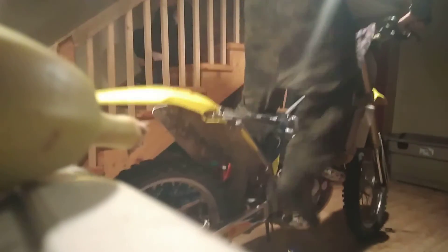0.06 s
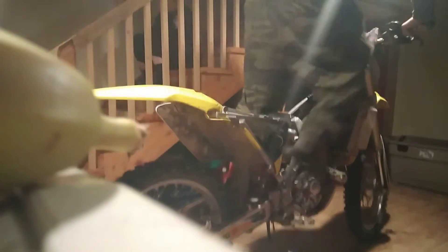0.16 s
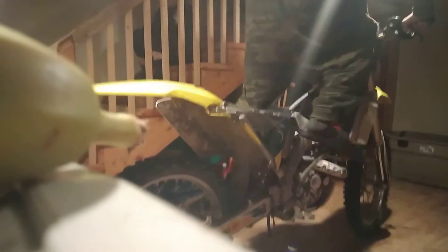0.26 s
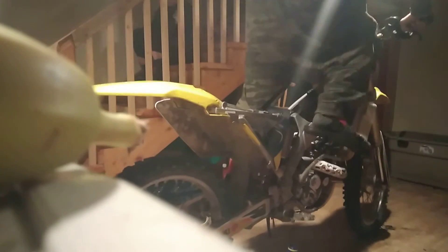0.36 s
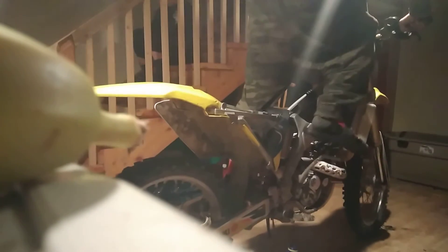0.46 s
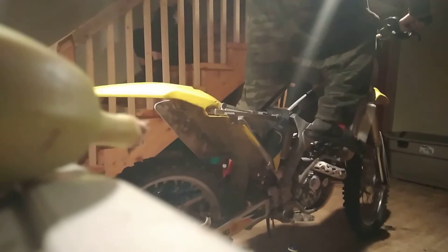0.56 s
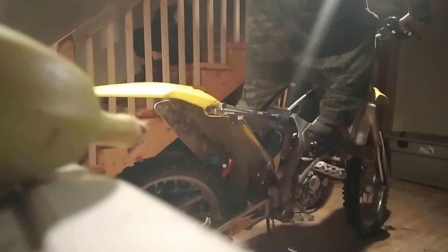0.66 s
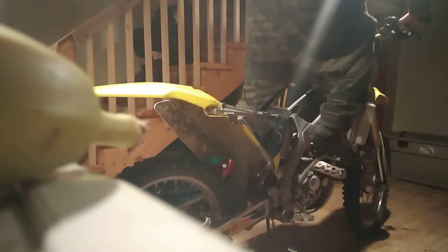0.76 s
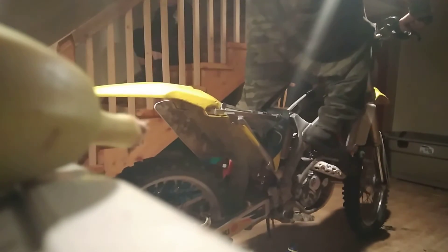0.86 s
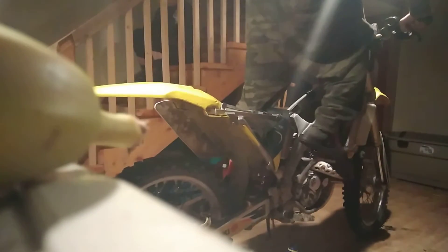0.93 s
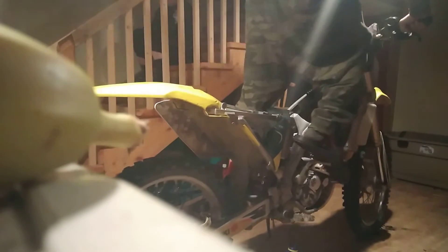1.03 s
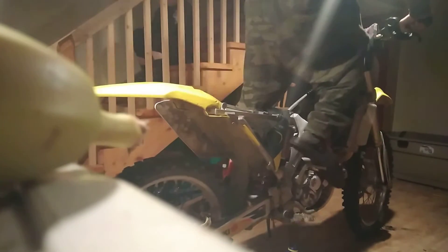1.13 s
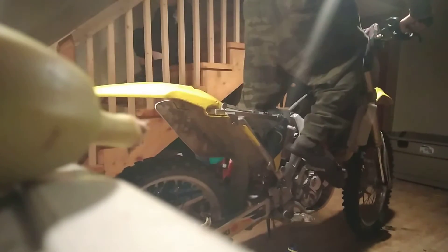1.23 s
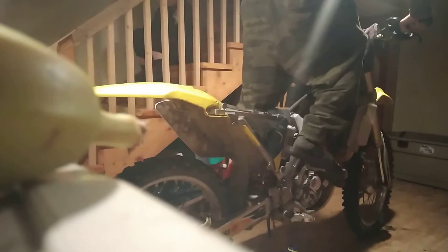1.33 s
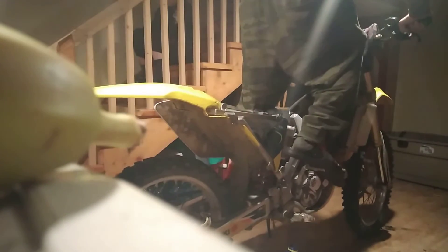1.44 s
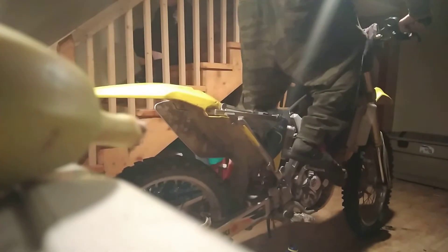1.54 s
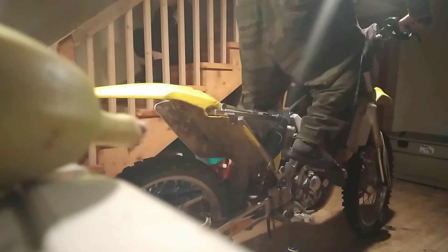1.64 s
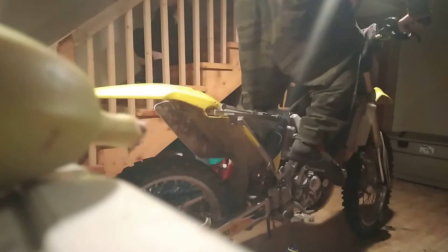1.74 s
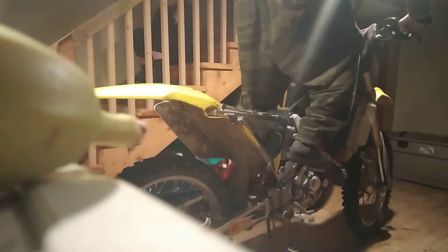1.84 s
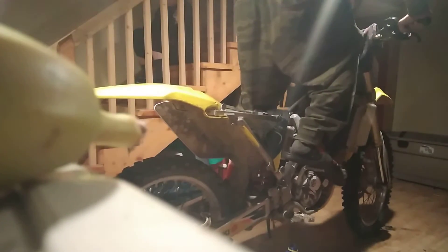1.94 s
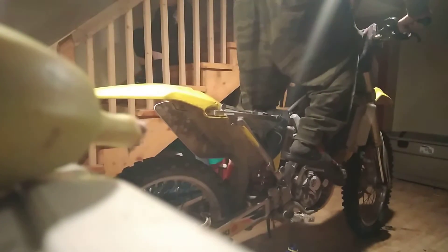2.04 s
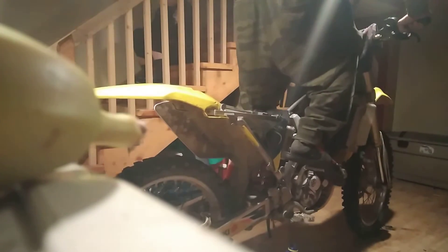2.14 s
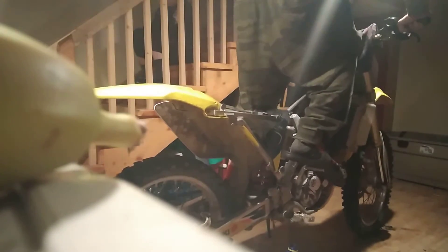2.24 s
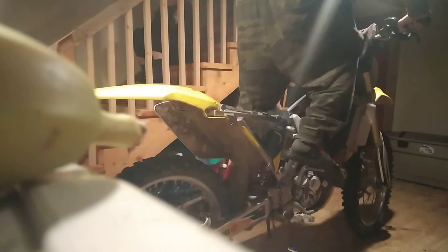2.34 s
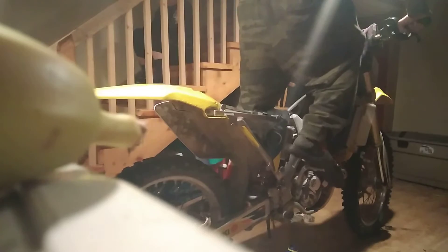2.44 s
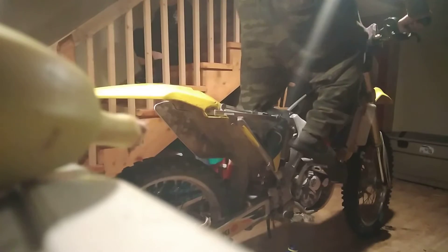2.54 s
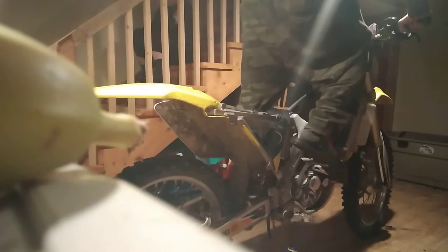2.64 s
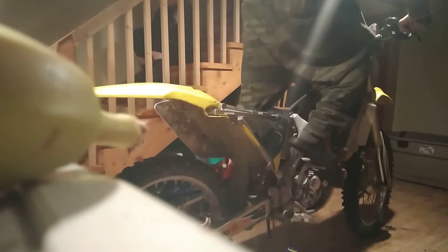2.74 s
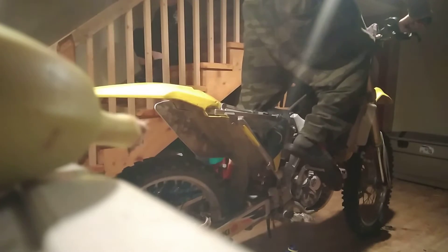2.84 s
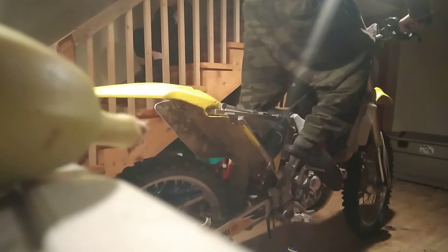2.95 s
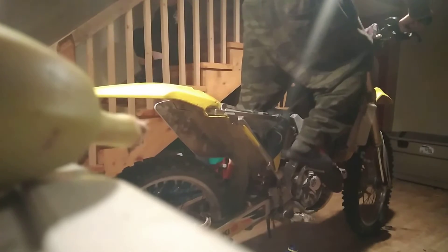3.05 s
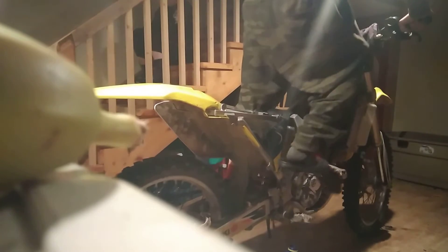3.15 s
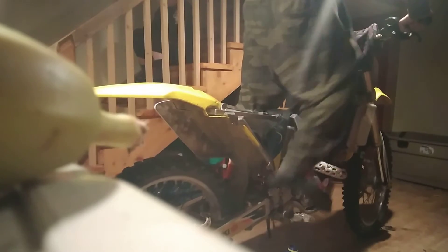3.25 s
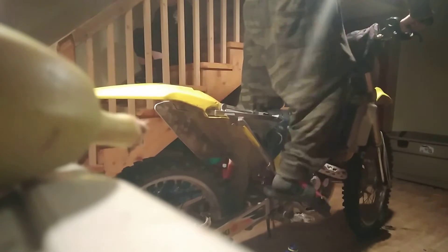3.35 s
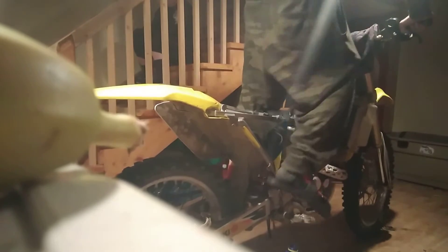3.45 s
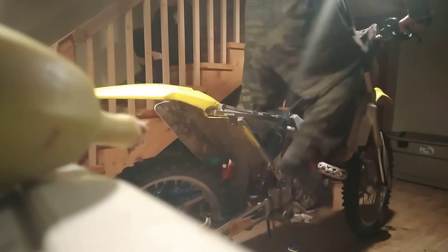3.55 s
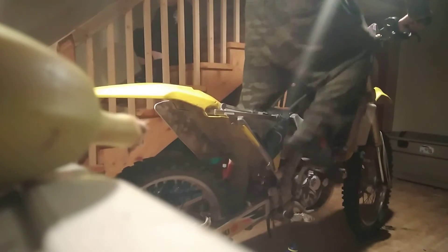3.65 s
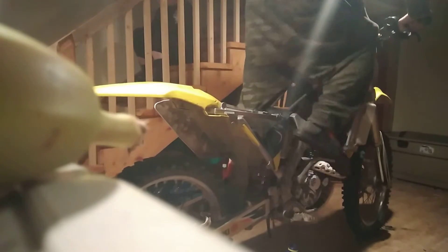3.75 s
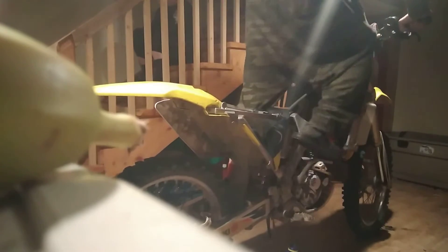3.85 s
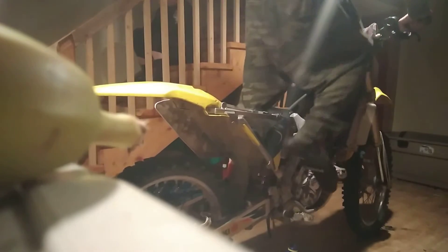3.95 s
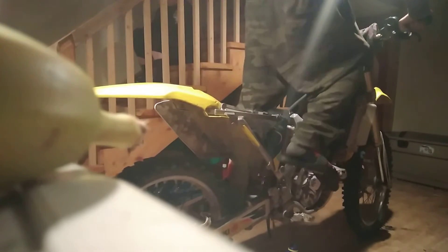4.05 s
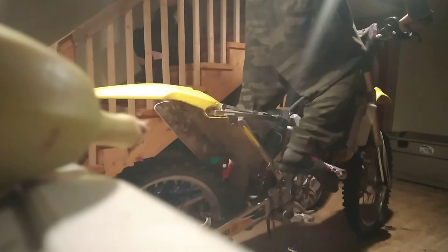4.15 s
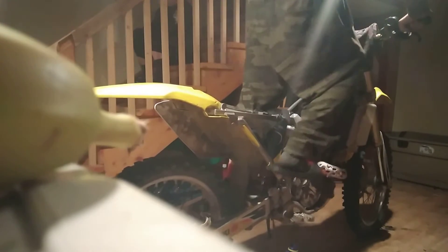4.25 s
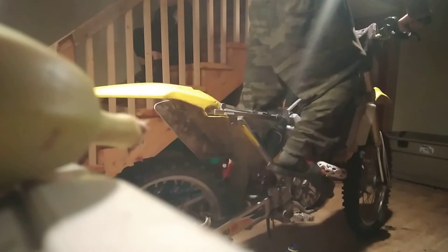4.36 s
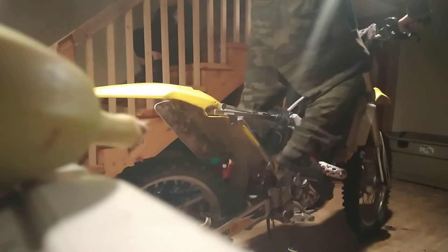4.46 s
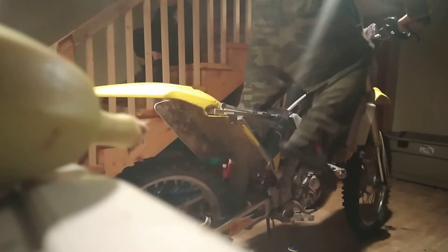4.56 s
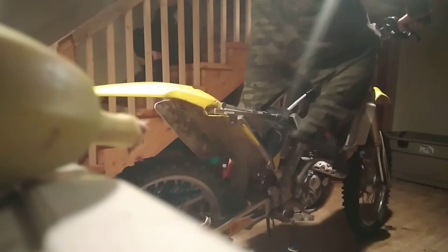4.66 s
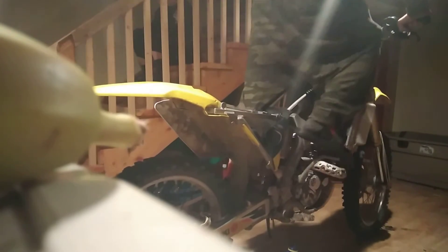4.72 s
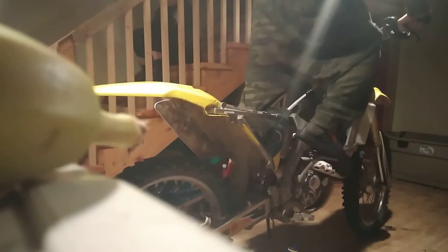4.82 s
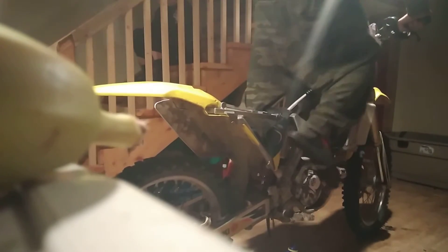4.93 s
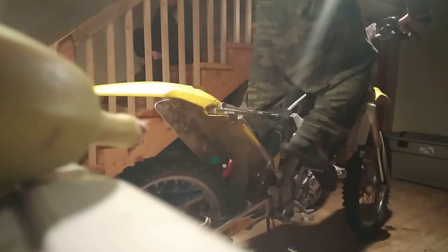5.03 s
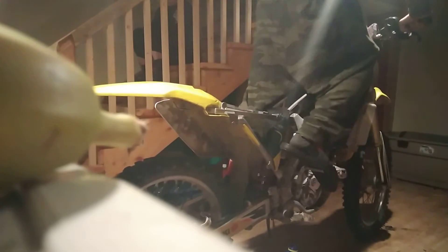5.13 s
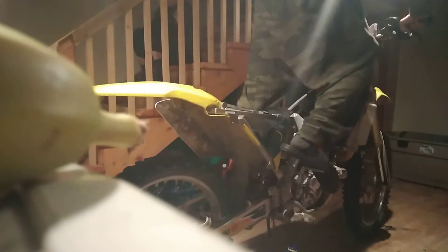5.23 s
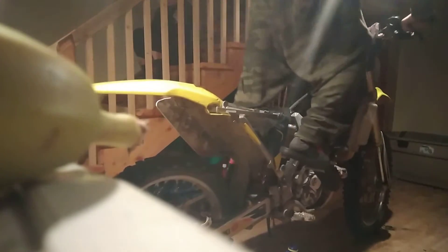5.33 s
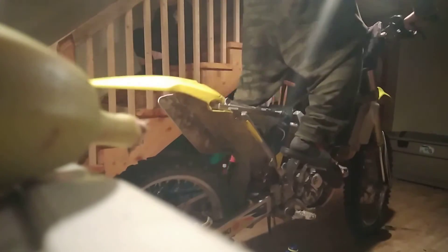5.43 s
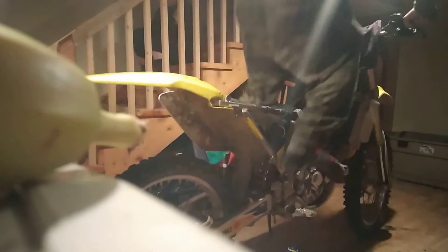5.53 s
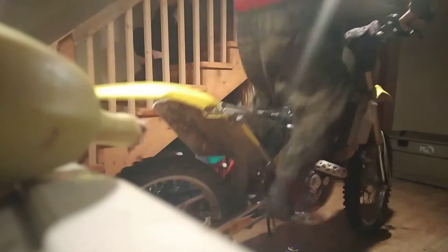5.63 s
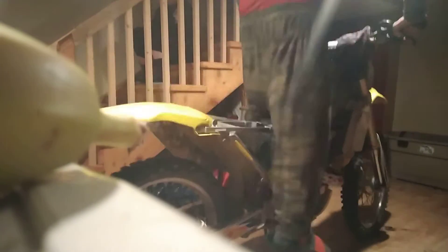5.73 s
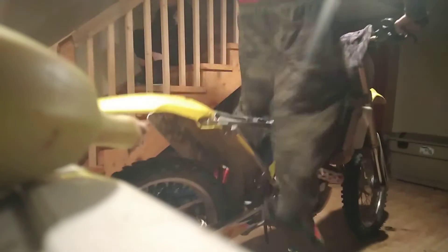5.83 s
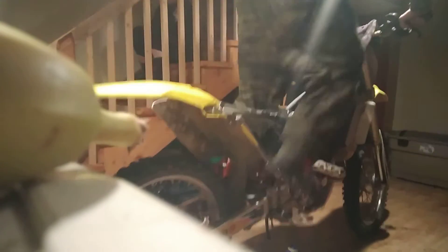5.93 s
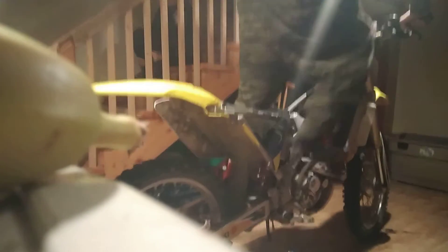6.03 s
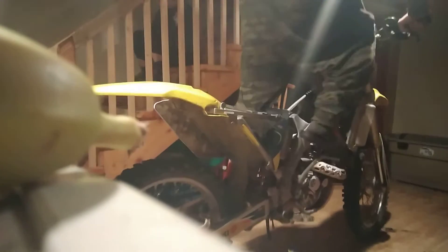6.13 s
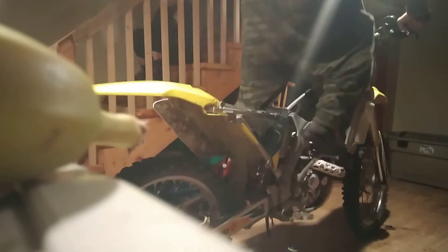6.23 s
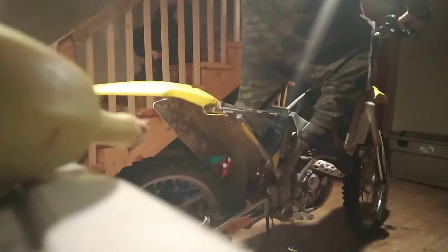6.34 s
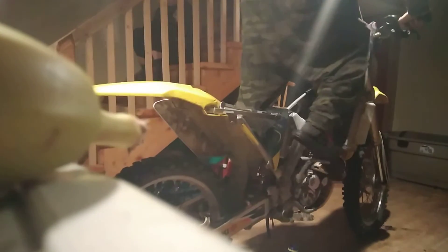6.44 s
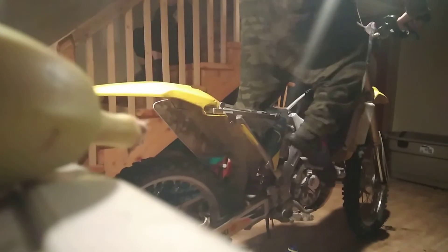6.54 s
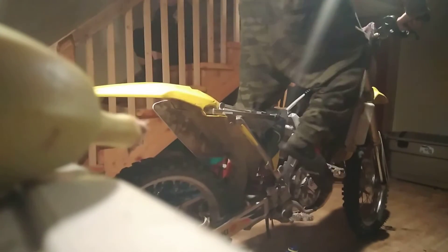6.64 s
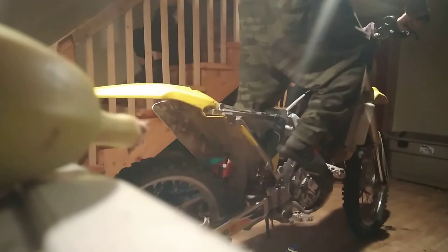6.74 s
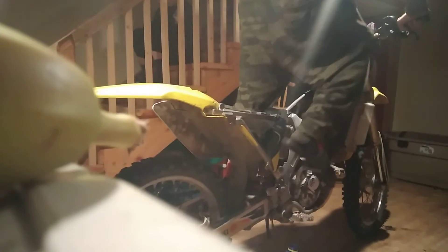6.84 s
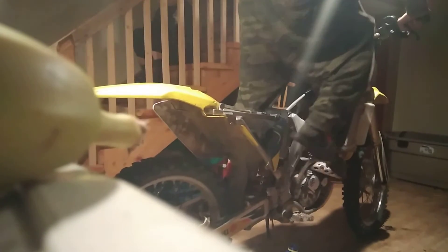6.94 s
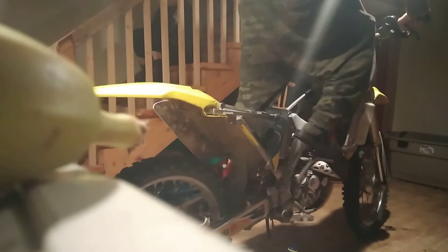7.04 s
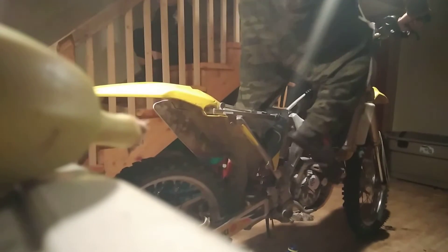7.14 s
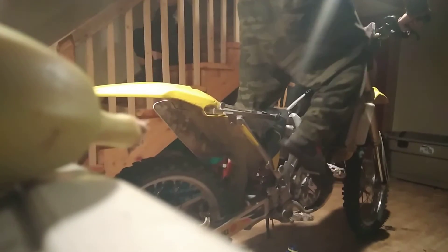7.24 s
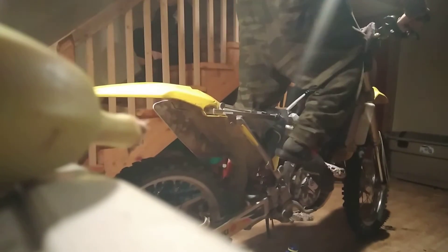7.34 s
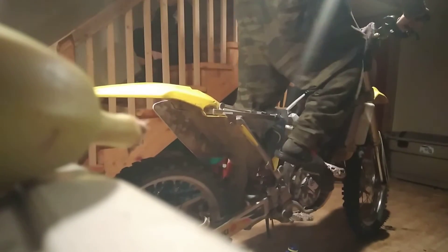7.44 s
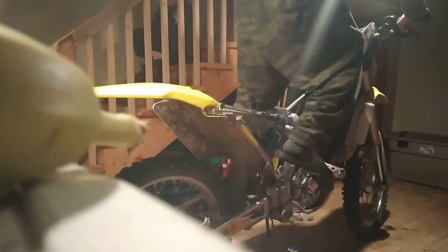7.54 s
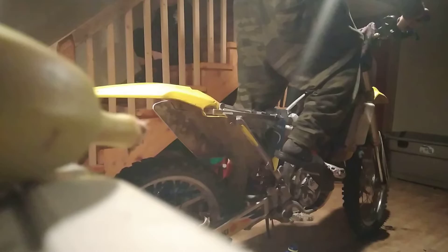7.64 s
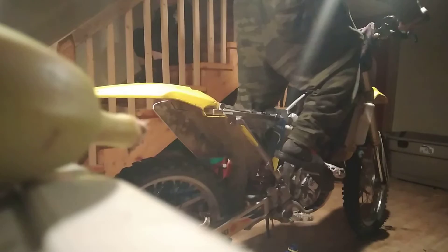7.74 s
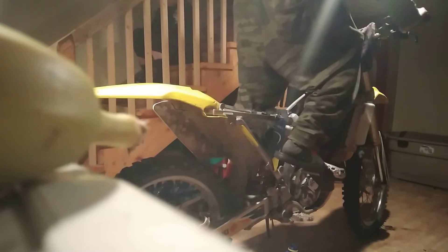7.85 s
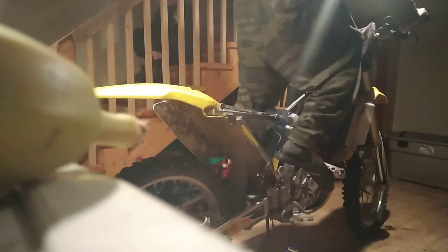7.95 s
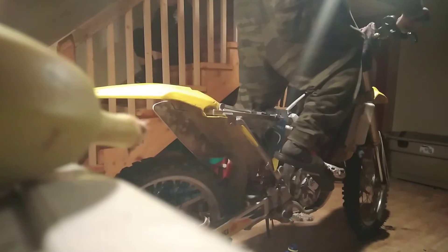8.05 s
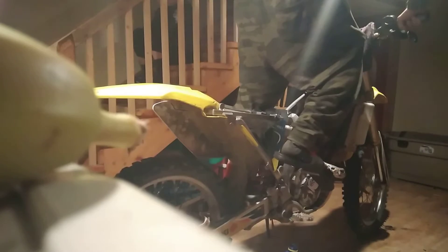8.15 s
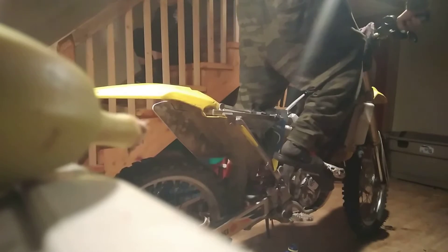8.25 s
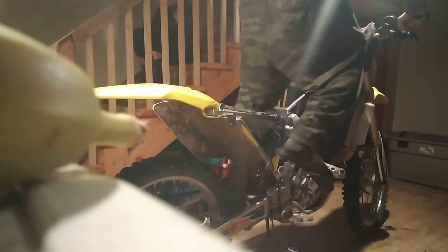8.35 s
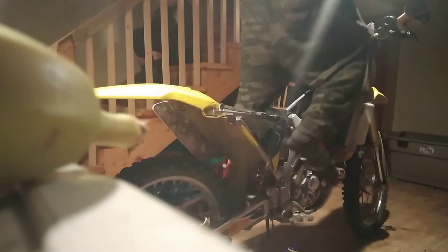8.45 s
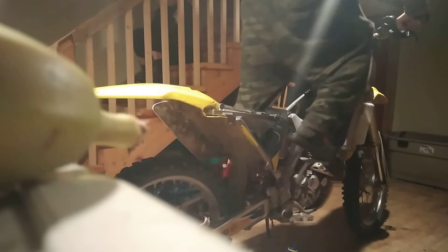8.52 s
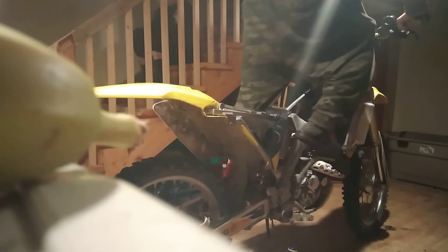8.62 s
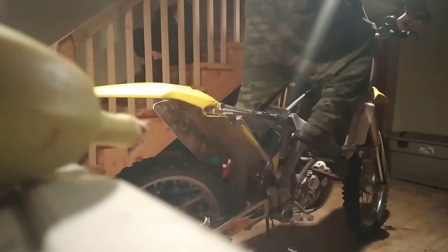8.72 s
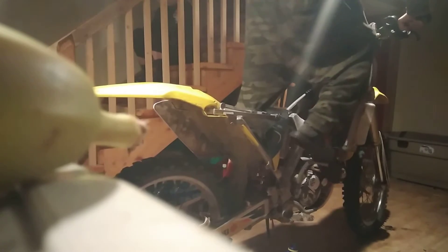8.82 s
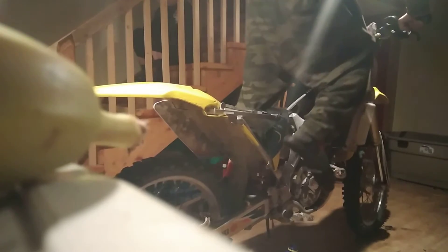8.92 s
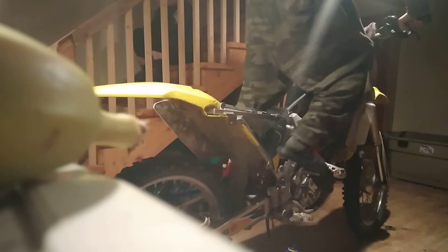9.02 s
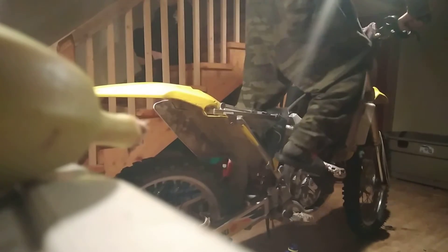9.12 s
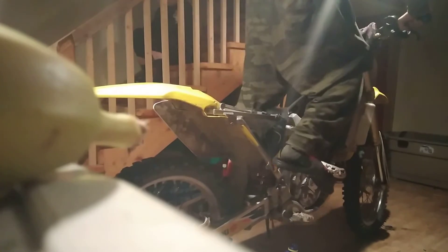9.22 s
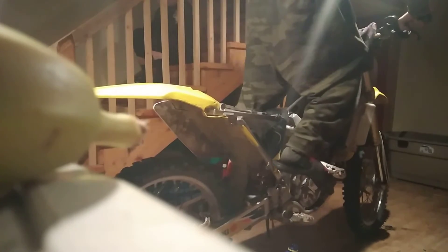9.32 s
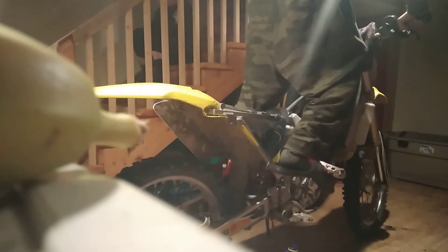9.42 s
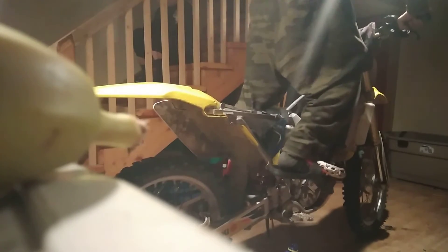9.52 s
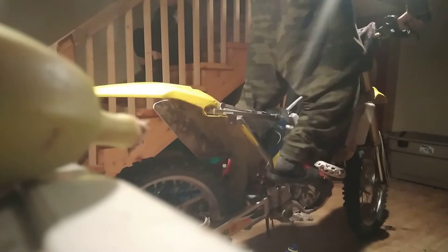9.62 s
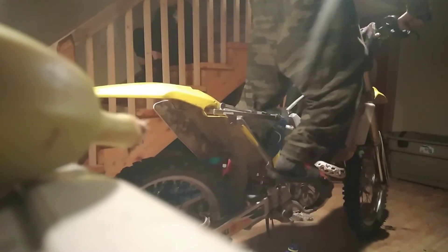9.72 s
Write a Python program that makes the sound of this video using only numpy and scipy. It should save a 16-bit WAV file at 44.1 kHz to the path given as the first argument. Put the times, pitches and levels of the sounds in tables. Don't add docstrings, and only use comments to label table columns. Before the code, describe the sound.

From 0 s, cut in at full force, a cold dirt bike engine is spun by a kick: rapid gear-tooth bites, rasping metal rattle and hollow low puffs in the pipe, clipping the input and sinking by 0.35 s. A clack and thud follow at 0.5-0.6 s. From 1 to 3 s there are faint ticks, barely audible cloth brushing and dull boot thuds near 1.9 and 2.3 s. At 3.2-3.35 s a quick scrape ends in a bright clank; more clacks at 3.7 s, soft knocks at 4-5 s, a heavy boom at 5.45 s. The second kick bursts at 5.68-5.97 s, clattery and loud, with trailing clacks to 6.2 s. Then quiet: small clicks at 7.3 and 7.8 s, a hollow clack at 8.2 s, faint ticks to the end near 9.8 s. Close phone, wooden basement, low rumble, treble gated between sounds.

```python
import sys
import numpy as np
from scipy import signal
from scipy.fft import rfft, irfft, next_fast_len
from scipy.io import wavfile
from scipy.ndimage import uniform_filter1d, minimum_filter1d, map_coordinates

SR = 44100
rng = np.random.default_rng(int(sys.argv[2]) if len(sys.argv) > 2 else 0)


def wav_out(sig):
    wavfile.write(sys.argv[1], SR, np.round(np.clip(np.atleast_2d(sig).T, -1, 1) * 32767).astype(np.int16))


def makeup_ratio(level_db):
    decades = np.asarray(level_db, float) / 20
    return 10 ** decades


N = 431298


def unit(x):
    return x / np.sqrt(np.mean(x ** 2) + 1e-20)


def along(points, hz):
    f, v = np.transpose(points)
    return np.interp(np.log(hz + 1), np.log(f + 1), v)


def curves(rows, silent=None):
    s, *cols = np.transpose(rows)
    return np.array([np.interp(np.arange(N) / SR, s, c, silent, silent) for c in cols])


def strokes(tables):
    return np.max([curves(rows, silent=-200) for rows in tables], axis=0)


def wobble(rate):
    steps = np.arange(0, N + 32, 32)
    knots = rng.standard_normal(int(N * rate / SR) + 4)
    return np.interp(np.arange(N), steps, map_coordinates(knots, [steps * rate / SR]))


def swell(s, db, rise, fall):
    t = np.arange(N) / SR - s
    return makeup_ratio(db + np.minimum(rise * t, -fall * t))


def filtered(x, response):
    m = next_fast_len(x.shape[-1] + SR // 8)
    return irfft(rfft(x, m) * response(np.fft.rfftfreq(m, 1 / SR)), m)[..., :x.shape[-1]]


def mode(f, hz, width, db):
    return makeup_ratio(db) * 1j * f * width / (hz * hz - f * f + 1j * f * width)


def noise(gain, size=N):
    # freq_hz, correlation
    alike = [(30, 0.92), (250, 0.94), (500, 0.88), (1000, 0), (2000, 0)]
    m = next_fast_len(size)
    f = np.fft.rfftfreq(m, 1 / SR)
    turn = np.arccos(np.clip(along(alike, f), 0, 1)) / 2
    real, imaginary = rng.standard_normal((2, 2, len(f)))
    spectrum = (real + 1j * imaginary) * gain(f)
    mid, side = irfft(spectrum * [np.cos(turn), np.sin(turn)], m)[:, :size]
    return unit(np.array([mid + side, mid - side]))


def coloured(spectrum, size=N):
    return noise(lambda f: makeup_ratio(along(spectrum, f)), size=size)


def patchy(x, depth_db):
    z = signal.stft(x, nperseg=512)[2]
    field = uniform_filter1d(rng.standard_normal(z.shape[1:]), size=4, axis=0)
    field = uniform_filter1d(field, size=9, axis=1)
    return unit(signal.istft(z * makeup_ratio(depth_db * unit(field)), nperseg=512)[1][:, :N])


def looped(x):
    return x[:, np.arange(N) % x.shape[1]]


def add(track, s, sound):
    part = track[round(s * SR):][:len(sound)]
    part += sound[:len(part)]


def gears():
    # time_s, pumping_db of the piston, load_db on the gears
    kicks = [
        [(0.0, -11, -17), (0.19, -5, -12), (0.3, -16.5, -21), (0.462, -68, -54), (0.49, -36, -42)],
        [(5.675, -33, -62), (5.712, -16, -29), (5.755, -13.5, -25.5), (5.765, -20, -15.5), (5.81, -8.5, -14.5),
         (5.97, -25.5, -28.5), (6.048, -42, -39.5), (6.1, -43.5, -35)],
    ]
    # freq_hz, density_db
    case = [(310, -28), (520, -1), (539, -1), (568, -2), (803, -7.5), (1270, -8.5), (1500, -20),
            (1950, -43.5), (3300, -120)]
    # freq_hz, density_db
    clatter = [(760, -32.5), (1300, -8.5), (2630, -4.5), (2980, -13), (3980, -8.5), (8760, -15.5),
               (9720, -16.5), (11600, -30), (15500, -33.5)]
    # freq_hz, width_hz, level_db
    fins = [(1688, 40, 6), (3550, 130, 0)]
    # freq_hz, density_db
    body = [(40, -120), (60, -5.5), (150, -1), (300, -5), (550, -4), (800, -40.5), (1500, -120)]
    top_hz, top_fades = 10800, 1.5

    pump_db, load_db = strokes(kicks)
    ringing = lambda f: makeup_ratio(along(clatter, f)) * (1 + sum(abs(mode(f, *m)) for m in fins))
    metal = patchy(noise(ringing, size=N // 4), depth_db=3)
    top = looped(filtered(metal, lambda f: 1 / (1 + (top_hz / (f + 1)) ** 20)))
    fine = makeup_ratio(top_fades * (load_db + 16.5)) * top
    rattle = makeup_ratio(load_db - 0.4 + 2.2 * wobble(55)) * (looped(metal) - top + fine)
    hum = looped(patchy(coloured(case, size=N // 4), depth_db=2.5))
    drone = makeup_ratio(load_db + 0.5 + 4.0 * wobble(40)) * hum
    pumping = makeup_ratio(pump_db + 2.0 + 4.0 * wobble(35)) * looped(coloured(body, size=N // 4))
    return rattle + drone + pumping


def pipe():
    # start_s, peak_db, pitch_hz
    puffs = [(0.0, -3.5, 169.6), (0.037, -1.5, 180.9), (0.094, -2, 179), (0.146, -2.5, 165.4),
             (0.184, -4.5, 207.6), (0.224, -2.5, 181.1), (0.234, -4, 128), (0.249, -5, 177.2),
             (0.284, -7, 175), (5.682, -8, 92), (5.705, -1, 109.8), (5.765, -4.5, 166.1),
             (5.835, -3.5, 177.1), (5.857, -2, 164.7), (5.879, -6, 84.44), (5.907, -3, 113.1),
             (5.939, -5.5, 159.4), (5.968, -10.5, 136)]
    # start_s, peak_db, pitch_hz
    last_puffs = [(.31, -13.5, 172.3)]
    # start_s, peak_db, pitch_hz
    teeth = [(0.0, 1.5, 418.7), (0.027, 2.5, 427.5), (0.059, 2, 407), (0.084, 4, 447), (0.115, 0.5, 455.7),
             (0.139, 1, 447.2), (0.164, -4, 557.8), (0.192, -2, 356.7), (0.219, -4, 440), (.25, -5, 400),
             (0.269, -3, 499), (0.3, -20, 471), (0.364, -19.5, 487), (.16, -3, 300), (.29, -11, 510),
             (5.715, -5.5, 429.6), (5.765, -3, 460), (5.81, 0.5, 445.3), (5.817, 5, 494.5),
             (5.839, -3, 396), (5.894, -8, 489.6), (5.924, -14, 434), (5.959, -21, 490), (6.009, -26, 512)]
    t = np.arange(SR // 3) / SR
    sound = np.zeros((2, N))
    for table, t60 in ((puffs, 0.19), (last_puffs, 0.46), (teeth, 0.14)):
        for (s, db, hz), skew in zip(table, 0.21 * rng.standard_normal(len(table))):
            for ear, turn in zip(sound, (skew, -skew)):
                ring = np.sin(2 * np.pi * hz * t + turn) * (1 - np.exp(-t / .004))
                add(ear, s, makeup_ratio(db + 1.0 - 60 * t / t60) * ring)
    return sound


def room(x):
    # freq_hz, t60_s
    decay = [(150, 0.2), (400, 0.17), (2700, 0.36), (10000, 0.17)]
    hz, t, z = signal.stft(rng.standard_normal((2, SR // 3)), SR, nperseg=256)
    tail = signal.istft(z * makeup_ratio(-60 * t / along(decay, hz)[:, None]), SR, nperseg=256)[1]
    return signal.oaconvolve(x, tail / np.linalg.norm(tail[0]), axes=1)[:, :N]


def house():
    # time_s, level_db
    stir = [(0, 0), (1.5, 1), (2.9, -3), (3.49, 3), (5.01, -1), (7.9, 1), (9.78, -2)]
    # freq_hz, density_db
    rumble_spectrum = [(7.1, -32.5), (12, 3), (28, -3.5), (43, -16.5), (70, -19.5), (110, -34), (140, -63),
                       (240, -120)]
    # freq_hz, density_db
    tone_spectrum = [(50, -120), (70, -3.5), (250, 1.5), (600, -3), (1500, -18), (4000, -29), (8000, -33.5),
                     (11000, -49.5), (13000, -120)]
    # rumble_peak_s, rumble_db, tone_peak_s, tone_db
    shakes = [
        (0, -30.5, .13, -5.5),
        (5.64, -27.5, 5.86, -24.5),
    ]
    stir_db, = curves(stir)
    rumble = makeup_ratio(stir_db - 56.5) + sum(swell(s, db, rise=120, fall=36) for s, db, _, _ in shakes)
    tone = makeup_ratio(stir_db - 61) + sum(swell(s, db, rise=130, fall=120) for _, _, s, db in shakes)
    deep = rumble * makeup_ratio(8.5 + 4.0 * wobble(2.8)) * coloured(rumble_spectrum)
    return deep + tone * makeup_ratio(1.5 * wobble(6.6)) * coloured(tone_spectrum)


def pings():
    # start_s, peak_db, pitch_hz, t60_s
    kick_pings = [(.03, -14, 1020, .2), (.02, -16, 1280, .15), (.085, -12, 1290, .15),
                  (.085, -18, 2000, .12), (.1, -22, 2700, .2), (.14, -22, 3390, .2), (.153, -28, 8330, .2),
                  (.2, -20, 1690, .4), (.226, -26, 6650, .2), (.232, -24, 3790, .2), (.268, -18, 1675, .3),
                  (.34, -34, 2640, .2), (.345, -30, 1675, .5), (.41, -39, 1675, .3), (5.69, -28, 8100, .2),
                  (5.69, -26, 6490, .2), (5.718, -17, 3450, .35), (5.757, -14, 2050, .2),
                  (5.757, -15, 2430, .2), (5.76, -14, 850, .15), (5.8, -14, 1250, .2),
                  (5.82, -14, 1390, .2), (5.845, -22, 4800, .15), (5.843, -31, 7980, .2),
                  (5.884, -31, 6780, .2), (5.884, -19, 9750, .3), (.15, -16, 1250, .15),
                  (.17, -12, 640, .15), (5.9, -18, 1000, .2), (5.94, -26, 1700, .3), (6.015, -30, 1720, .3),
                  (6.02, -32, 1270, .2), (6.065, -30, 1720, .4), (6.06, -32, 1270, .2),
                  (6.085, -29, 1265, .2), (6.2, -34, 880, .2)]
    # start_s, peak_db, pitch_hz, t60_s
    idle_pings = [(1.38, -58, 2000, .4), (2.142, -40, 950, .2), (2.142, -43, 1250, .12),
                  (2.165, -47, 1890, .3), (2.165, -51, 3900, .3), (3.335, -29, 2150, .3),
                  (3.337, -33, 1200, .2), (3.34, -34, 3960, .4), (3.345, -35, 4550, .4),
                  (3.342, -41, 6220, .3), (3.344, -40, 8320, .3), (3.348, -40, 7870, .3),
                  (3.35, -28, 1850, .5), (3.39, -35, 1950, .6), (3.648, -42, 3800, .25),
                  (3.652, -40, 1100, .2), (3.7, -39, 2640, .3), (3.7, -41, 3900, .2), (3.7, -38, 1720, .2),
                  (3.738, -45, 6200, .2), (3.74, -38, 2560, .3), (3.74, -44, 4770, .2),
                  (3.74, -37, 1700, .3), (4.682, -37, 800, .2), (4.688, -40, 1720, .25),
                  (4.682, -44, 5600, .2), (4.682, -42, 4200, .25), (5.008, -47, 2750, .3),
                  (5.01, -46, 3800, .3), (5.445, -38, 2250, .6), (5.447, -40, 3500, .2),
                  (5.587, -50, 5200, .3), (7.25, -49, 800, .2), (7.279, -47, 2750, .2),
                  (7.283, -47, 3800, .2), (7.29, -50, 1670, .2), (7.925, -54, 5900, .2),
                  (8.122, -49, 3500, .6), (8.192, -42, 3390, .4), (8.192, -43, 2200, .25),
                  (8.192, -44, 1240, .2), (8.192, -34, 540, .25), (8.505, -57, 2600, .4),
                  (8.985, -49, 2530, .3), (9.69, -66, 3400, .4), (9.713, -58, 3300, .4)]
    t = np.arange(SR // 8) / SR
    sound = np.zeros((2, N))
    for s, db, hz, t60 in kick_pings + idle_pings:
        drift = .002 * np.sqrt(hz) * np.cumsum(rng.standard_normal((2, len(t))), axis=1)
        fade = makeup_ratio(db - 60 * t / t60) * (1 - np.exp(-t / .003)) * np.cos(4 * np.pi * t)
        for ear, wander in zip(sound, drift):
            add(ear, s, fade * np.sin(2 * np.pi * hz * t + wander))
    return sound


def clacks():
    # start_s, peak_db, sizzle_db re peak, knock_db re peak
    lever = [(.4856, -25.5, -22, .5), (.599, -43, -36.5, 7), (1.194, -45.5, -13, -1), (1.882, -44, -13, -5),
             (2.309, -40.5, -13, 1), (3.697, -25, -30, 0), (3.7385, -25, -10, 1),
             (4.3323, -50.5, -42, 19.5), (5.4241, -54, -18, 11), (5.645, -40.5, -37, 12),
             (5.985, -21, -37.5, -14), (6.0375, -20.5, -35.5, -5), (6.0918, -21, -16, 0),
             (6.2016, -34, -14.5, 8), (6.987, -44, -13, 2.5), (8.9452, -48.5, -20, 4.5),
             (9.0388, -54, -27, 12.5)]
    peg = [(.0897, -15, -23.5, -5.5), (3.3343, -21, -7, -14), (3.352, -22, -11, -16), (5.7563, -1, -6, -6),
           (7.3286, -47.5, -27.5, 9.5), (7.8226, -38, -14.5, -0.5)]
    spring = [(1.2396, -46, -21.5, 1.5), (3.3172, -30, -5.5, -9), (4.0237, -35.5, -21, -4),
              (5.0076, -34, -24, -30), (5.0474, -39, -23, 3), (6.6252, -37.5, -34, -8),
              (6.6822, -44.5, -31.5, 4), (6.9154, -44.5, -29, -17.5), (7.248, -40, -26.5, -4.5),
              (7.2782, -29.5, -29.5, -19), (8.5047, -46, -25, -11.5)]
    pawl = [(5.7204, -15, -19, -5), (7.9094, -46, -10, -3), (8.1224, -42, -17.5, -17.5),
            (8.191, -31, -15, -1.5), (9.7143, -53, -34, -2)]
    pin = [(1.1694, -50.5, -12, 2), (3.9976, -36.5, -26, -19.5), (4.6139, -42, -36, -21),
           (4.2594, -50, -8, 0), (8.577, -42.5, -16.5, 1)]
    rubber = [(2.1425, -31.5, -15, -2), (2.185, -40, -14, -6), (3.5323, -34, -21, -18),
              (3.648, -32, -22, 3.5), (4.681, -24, -12, -2), (5.4435, -26, -15, -1.5),
              (5.5873, -36.5, -9.5, -17), (8.9782, -32, -33, -16)]
    cover, shield = [(5.688, -12, 2, -9.5)], [(5.8829, -16.5, 0.45, 0.92)]
    # start_s, peak_db
    ticks = [(.8994, -51), (1.0131, -53), (1.348, -53), (1.3848, -49), (1.4414, -51.5), (1.9994, -56),
             (2.4624, -53), (2.8532, -50.5), (2.872, -54.5), (6.3705, -50), (6.5724, -48), (6.7994, -51),
             (7.5148, -46), (7.5695, -50.5), (7.7283, -47), (7.765, -50), (8.075, -57), (8.3524, -52.5),
             (8.4254, -49.5), (9.772, -55)]
    # freq_hz, density_db
    metal = [(470, -34.5), (800, -3.5), (1670, -6), (2270, -6), (2610, -6), (2930, -7.5), (6500, -17),
             (8450, -39.5), (14300, -120)]
    # freq_hz, density_db
    sizzle = [(3240, -29.5), (5500, -11.5), (7650, -9), (8560, -10), (9660, -9.5), (11600, -28),
              (15500, -45)]
    # freq_hz, density_db
    hollow = [(300, -120), (450, -7.5), (600, -1.5), (1100, -4.5), (1400, -14.5), (2200, -120)]
    faint = [(s, db, -36, -1) for s, db in ticks]
    # contacts, pitch_hz, ring_db re peak
    parts = [(lever, 1730, -13), (peg, 2040, -14), (spring, 2570, -15), (pawl, 3400, -9.5), (pin, 3900, -15),
             (rubber, 2300, -30), (cover, 6464, -25), (shield, 9620, -3), (faint, 2000, -14)]
    t60 = 0.42
    lead = .002
    soft_rings = 0.05

    t = np.arange(SR // 3) / SR
    fade = makeup_ratio(-60 * t / t60) * (1 - np.exp(-t / .002))
    shape = fade ** 2 * (1 + 1.4 * makeup_ratio(-60 * t / 0.062))
    bright = shape * makeup_ratio(-60 * t / t60)
    ringing = (fade * makeup_ratio(-12 * t / t60))[:SR // 6]
    body, top, knock, left, right = np.zeros((5, N))
    contacts = [(*row, *ring) for rows, *ring in parts for row in rows]
    for s, db, sizzle_db, knock_db, hz, ring_db in contacts:
        s = max(s - lead, 0)
        add(body, s, makeup_ratio(2 * (db - 12.0)) * shape)
        add(top, s, makeup_ratio(2 * (db + sizzle_db - 8)) * bright)
        add(knock, s, makeup_ratio(2 * (db + knock_db - 11)) * shape)
        drift = np.cumsum(rng.normal(0, .0026 * np.sqrt(hz), (2, len(ringing))), axis=1)
        gain = makeup_ratio(db + ring_db - soft_rings * (db + 40.5))
        for ear, wander in zip((left, right), drift):
            add(ear, s, gain * ringing * np.sin(2 * np.pi * hz * t[:len(ringing)] + wander))
    tails = np.sqrt(body) * patchy(coloured(metal), depth_db=3) + np.sqrt(top) * coloured(sizzle)
    return tails + np.sqrt(knock) * coloured(hollow) + [left, right]


def thuds():
    # start_s, peak_db, board_hz, boom_db re peak
    boots = [(0.488, -21, 171, -1.5), (0.895, -45.5, 121, -5), (1.199, -47, 269, 4.5),
             (1.884, -26, 233, -5), (2.315, -27.5, 167.3, -4), (2.854, -58, 492, -8),
             (3.214, -40, 288, -15.5), (3.329, -22, 471.5, 0), (3.792, -28, 232.6, -0.5),
             (3.999, -49, 429, 12), (4.029, -27.5, 152.6, -3), (4.334, -34.5, 157.3, 4),
             (4.811, -26.5, 157.5, -3.5), (5.444, -13.5, 155.5, 4), (5.491, -22.5, 249.3, 10),
             (6.471, -41, 160.8, 6), (7.098, -42, 152.9, 8), (7.52, -42, 420, -3.5),
             (8.662, -40.5, 164, -5), (9.408, -57, 213.4, -12)]
    # start_s, peak_db, board_hz
    stand = [(.601, -25.5, 162.6), (1.018, -50, 335), (1.999, -42.5, 276), (3.419, -27, 230),
             (3.74, -36.5, 427), (4.422, -36.5, 148.2), (5.01, -46.5, 357), (5.056, -41, 407),
             (6.201, -27.5, 135.4), (6.63, -44, 422), (6.684, -44.5, 425), (6.87, -42.5, 276.5),
             (6.99, -49, 424), (7.322, -42.5, 270), (7.727, -44.5, 360), (8.35, -34.5, 232.4),
             (9.689, -43, 372.4)]
    # start_s, peak_db, frame_hz
    stop = [(2.143, -31, 266), (3.654, -36, 498), (3.699, -32, 421), (4.683, -36, 410), (5.646, -21, 155),
            (6.095, -28.5, 418), (7.254, -42, 479), (7.824, -39.5, 505), (8.122, -39, 435),
            (8.188, -27.5, 356), (8.58, -47.5, 498), (8.942, -44.5, 275), (9.034, -39.5, 778)]
    # freq_hz, density_db
    boards = [(65, -35), (110, -11), (247, 0), (421, -11), (561, -11), (679, -13.5), (763, -14.5),
              (1400, -34), (1820, -64.5), (3080, -120)]
    t60, boom_hz = 0.42, 51.78
    t = np.arange(SR // 2) / SR
    fade = makeup_ratio(-60 * t / t60) * (1 - np.exp(-t / 0.0009))
    slow = fade * (1 - np.exp(-t / 0.0083))
    board = makeup_ratio(-5 - 30 * t / t60) * fade
    lowest = makeup_ratio(-6.0) * slow * np.sin(2 * np.pi * boom_hz * t)
    tail, deep, rings = np.zeros((3, N))
    light = [(*row, -7) for row in stand] + [(*row, -32) for row in stop]
    for s, db, hz, boom_db in boots + light:
        add(tail, s, makeup_ratio(2 * (db - 8.0 + 0.082 * boom_db)) * fade ** 2)
        add(deep, s, makeup_ratio(2 * (db + boom_db - 6.5)) * slow ** 2)
        add(rings, s, makeup_ratio(db) * (board * np.sin(2 * np.pi * hz * t) + makeup_ratio(boom_db) * lowest))
    boom = noise(lambda f: mode(f, 49, 46, 0) ** 2)
    return np.sqrt(tail) * coloured(boards) + np.sqrt(deep) * boom + rings


def brushes():
    # start_s, length_s, level_db
    rubs = [(.93, .25, -71), (1.28, .2, -70), (1.47, .28, -69.5), (4.86, .15, -71), (6.74, .14, -70),
            (7.05, .13, -71), (9.27, .07, -68.5), (9.36, .11, -68)]
    # freq_hz, density_db
    cloth = [(500, -120), (900, -6), (1800, 0), (2800, -4), (4500, -16), (7000, -120)]
    gain = np.zeros(N)
    for s, length, db in rubs:
        phase = np.pi * np.linspace(0, 1, int(length * SR), endpoint=False)
        add(gain, s, makeup_ratio(db) * np.sqrt(np.sin(phase)))
    return gain * makeup_ratio(2.5 * wobble(40)) * looped(coloured(cloth, size=N // 4))


def cracks():
    # start_s, level_db, t60_s
    sharpest = [(2.142, -76, .2), (3.335, -51, .3), (4.681, -64, .2), (5.687, -35, .4), (5.765, -36, .3),
                (5.883, -42, .2)]
    # freq_hz, density_db
    air = [(9000, -120), (11000, 0), (13000, -3), (15600, -7), (17000, -30)]
    gain, t = np.zeros(N), np.arange(SR // 4) / SR
    for s, db, t60 in sharpest:
        add(gain, s, makeup_ratio(db - 60 * t / t60))
    return gain * looped(coloured(air, size=N // 4))


def scrape():
    # time_s, level_db
    drag = [(3.2, -67), (3.22, -60.5), (3.3, -49), (3.33, -37), (3.36, -74.5)]
    # freq_hz, width_hz, level_db
    pivot = [(875, 900, 5.5), (3030, 290, 1.5), (6100, 2700, -2.5)]
    db, = strokes([drag])
    grain = noise(lambda f: sum(abs(mode(f, *m)) ** 2 for m in pivot), size=N // 4)
    return makeup_ratio(db + 2.0 * wobble(140)) * looped(grain)


def suppressor(x):
    low_hz, high_hz = 1200, 7000
    ear_s, memory_s, ahead_s = .008, .08, .005
    threshold_db, follows, quiet_db, soft_db = -49, .3, -70, 4
    treble = filtered(x, lambda f: 1 / (1 + (low_hz / (f + 1)) ** 8) / (1 + (f / high_hz) ** 8))
    keep = np.exp(-1 / (ear_s * SR))
    power = signal.lfilter([1 - keep], [1, -keep], np.mean(treble ** 2, axis=0))
    level_db = 10 * np.log10(power + 1e-12)
    span = round(memory_s * SR / 2)
    recent_db = -minimum_filter1d(-level_db, size=2 * span + 1, origin=span)
    floor_db = np.maximum(threshold_db + follows * recent_db, quiet_db)
    wanted = np.clip((level_db - floor_db) / soft_db, 0, 1)
    ahead = round(ahead_s * SR)
    return np.pad(wanted[ahead:], (0, ahead))


def scene():
    engine = gears() + pipe()
    contacts = pings() + clacks() + thuds() + brushes() + cracks() + scrape()
    return engine + makeup_ratio(-16) * room(engine) + house() + contacts


def band_limit(x):
    return signal.sosfilt(signal.butter(12, 15650, fs=SR, output="sos"), x)


def record(dry):
    # freq_hz, gain_db
    mic = [(10000, 0), (12000, -0.5), (16000, -2.5)]
    # freq_hz, gain_db
    shut = [(300, -3), (1050, -10), (1350, -16), (4000, -22), (12000, -16)]
    lag_s = np.array([[6 / 44100], [0]])
    dry = filtered(dry, lambda f: makeup_ratio(along(mic, f)) * np.exp(-2j * np.pi * f * lag_s))
    share = uniform_filter1d(suppressor(dry), size=90)
    x = share * dry + (1 - share) * filtered(dry, lambda f: makeup_ratio(along(shut, f)))
    x = x + makeup_ratio(-89.5) * rng.standard_normal(x.shape)
    x = x / (1 + np.abs(x / .99) ** 14) ** (1 / 14)
    return band_limit(x)


dry = scene()
out = record(dry)
wav_out(out)
```